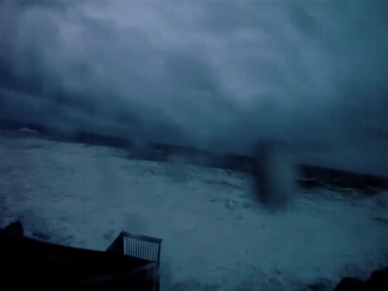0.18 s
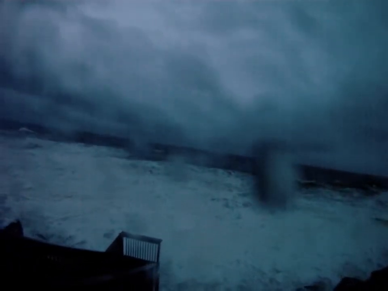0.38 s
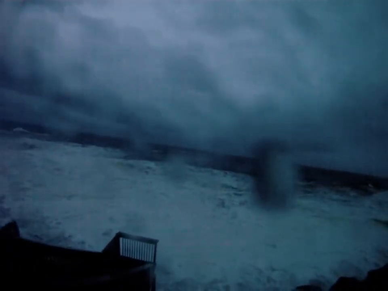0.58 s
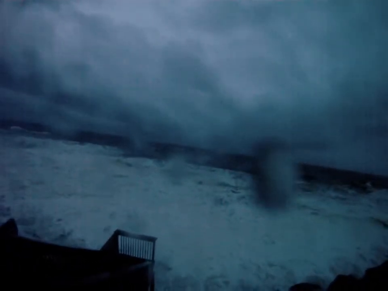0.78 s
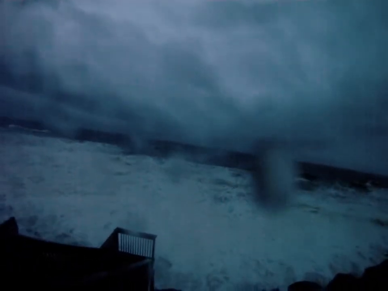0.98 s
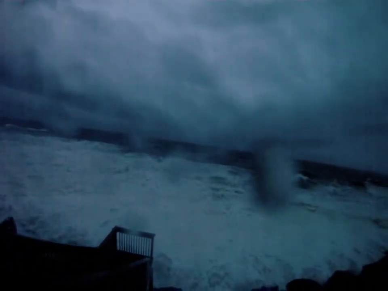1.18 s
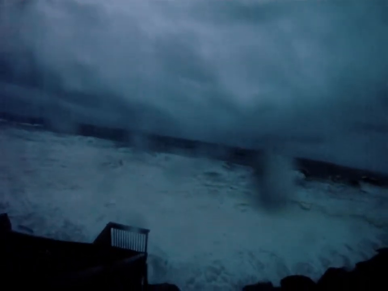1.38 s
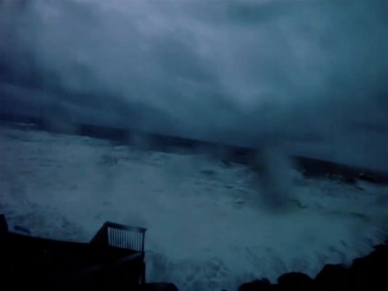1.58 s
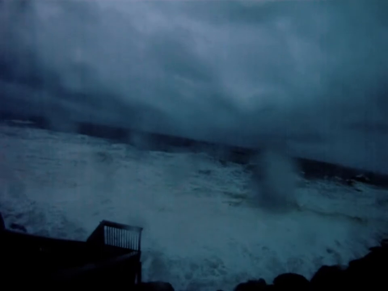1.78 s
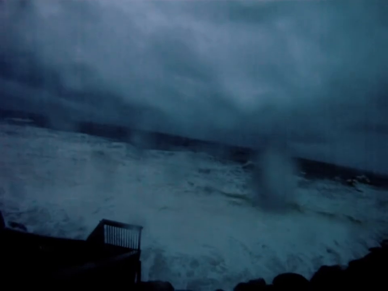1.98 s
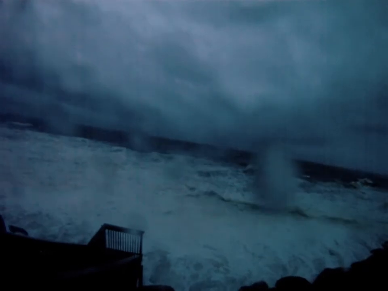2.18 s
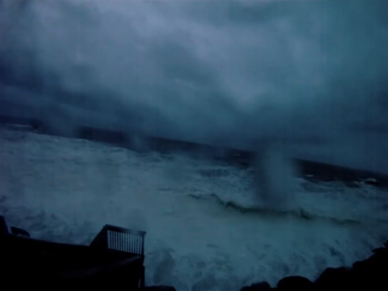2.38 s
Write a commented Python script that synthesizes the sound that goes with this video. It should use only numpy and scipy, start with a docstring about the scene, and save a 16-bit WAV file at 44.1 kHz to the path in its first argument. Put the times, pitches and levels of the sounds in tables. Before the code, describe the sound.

Sharp drops tap a plastic housing throughout about 2.4 seconds, close and centred. Two strong knocks come near 0.2 s, then scattered ticks, with a loud dull tap at 0.7 and another at 1.6. Muffled surf hushes behind, dips around 0.9, swells from 1.3 and peaks near 1.75. Spray washes past at 1.7; fine droplets patter. Low wind gusts thump near 0.5, 1.45, 1.6 and 2.35.

```python
"""Inside a waterproof camera housing at a seawall: storm surf rushes and swells in the second half.
The surf is coloured noise with drifting patches; wind rumbles on the case as low, gusty noise.
Drops of spray tick on the plastic shell: each rings its short modes, splatters and rebounds.
A patter of fine droplets follows the swell, and a brief sheet of spray washes past."""
import sys
import numpy as np
from scipy import signal
from scipy.fft import rfft, irfft
from scipy.io import wavfile
from scipy.ndimage import uniform_filter1d

SR = 44100
rng = np.random.default_rng(int(sys.argv[2]) if len(sys.argv) > 2 else 0)


def store_pcm(level_fs):
    """Save levels as 16-bit WAV."""
    pcm = np.round(np.clip(level_fs, -1, 1) * 32767).astype(np.int16)
    wavfile.write(sys.argv[1], SR, np.atleast_2d(pcm).T)


N = 105840

# Rush of the surf through the shell, relative: pitch_hz, density_db (per Hz)
SURF_COLOUR = [(100, 11.5), (300, 0), (500, -6), (800, -8.5), (1220, 1), (1600, -5.5), (2250, 0.5),
               (2700, -0.5), (3150, -8.5), (3700, -0.5), (4300, -11), (5400, -14.5), (7000, -19),
               (7700, -17.5), (8500, -8.5), (9000, -14.5), (9900, -15.5), (10600, -20.5), (11300, -48.5)]
# Rise and fall of the surf, before SURF_TRIM_DB: time_s, level_db
SWELL_LEVEL = [(0.02, -44.5), (0.54, -44), (0.72, -46.5), (0.95, -47), (1.32, -44), (1.46, -42),
               (1.75, -40.5), (2.4, -41.5)]
SURF_TRIM_DB, PATCH_RMS_DB, FLICKER_RMS_DB = 1, 1.78, 1.5

# One sheet of spray sweeping the case: centre_s, width_s, level_db
SPRAY_SHEET = (1.674, 0.048, -41)
# Its colour, relative: pitch_hz, density_db (per Hz)
SPRAY_COLOUR = [(100, -3), (300, 3), (800, -3), (2500, 0), (5000, -7), (10500, -16)]

# Large drops on the shell: start_s, level_db (before DROP_TRIM_DB), then colour against the third point:
# thud_db, knock_db, tick_db, fizz_db, top_db; then splatter_db (against the modes),
# rebound_delay_s, rebound_db (against the first tap)
DROP_HITS = [(0.2182, -1, -22, -18, -11.5, -14, -13.5, -30, 0.00077, -1),
             (0.2468, 3, 12.5, -5, -15.5, -12.5, -9, -42, 0.00089, -8),
             (0.3424, -28, -1, -5, -3, -5, -13, -26, 0.00032, -3),
             (0.4362, -29, 1, 3, 0, 3, -9, -20, 0.00031, -5),
             (0.5882, -20.5, -5, -14, -14, -10, -14, -28.0, 0.00083, -8),
             (0.6748, -29.5, -4, -8, -10, -7, -11, -28.0, 0.00087, -5),
             (0.6958, -11, 4, -12, -16, -16, -13, -23, 0.00087, -1.5),
             (0.915, -16.5, -22, -7.5, 9, 7.5, -13.5, -33, 0.00031, -12),
             (0.952, -28.5, 6, -3, 0, -5, -15, -39, 0.00058, -15),
             (1.113, -21, 2, -11, -24, -30, -15.5, -30, 0.0012, -1),
             (1.2153, -14.5, -13, 0, 4, 3, -15, -17, 0.0005, -9),
             (1.237, -40, -11, -1, -7, -13, -9, -27.0, 0.00045, -10),
             (1.3216, -26.5, 13, 0.5, -5.5, -17, -8, -28.0, 0.00055, -9),
             (1.3785, -15.5, -20, 0, -1.5, -7, -12, -25.0, 0.0011, -2.5),
             (1.3822, -19, -12, -28, 5.5, 3.5, -15, -30, 0.00084, -12),
             (1.58, -17.5, -10, -21.5, -14, -15, -12, -28.0, 0.00076, -4),
             (1.609, -2.5, -9, -17, -19, -39, -10, -29, 0.00087, -13.5),
             (1.618, -32, -13, -7, -9, 3, -16, -23.0, 0.00032, -7),
             (1.677, -27, 0, 4, 2, 0, -9, -19.0, 0.00041, 0),
             (1.775, -33, -12, -11, 5, 0, -15, -25.0, 0.00045, -10),
             (1.783, -23.5, -15, -1, -5, -9, -10, -30, 0.00052, -6),
             (1.876, -25, 7, 0.5, -13, -10, -16, -23, 0.00031, -4),
             (1.9474, -21.5, -7, -25, -10, -13, -13, -25, 0.00054, -1),
             (1.9662, -19.5, -1, 3, 1.5, -1.5, -12, -17, 0.00038, -2.5),
             (2.1149, -9, -8, -10, -1.5, -3.5, -9, -27.0, 0.00059, -11),
             (2.1785, -26.5, 2, -6, 7, 4, -10, -30, 0.00058, -7),
             (2.255, -30.5, -1, -21, 6, 2, -12, -23.0, 0.00034, -5),
             (2.2876, -16.5, -4, -24, -11, -18, -12, -25, 0.00068, -4),
             (2.2923, -17, -10, -13, -1, -2, -14, -19, 0.00038, -4)]
# Where a drop's colour is set, the third point being its 0 dB: pitch_hz
DROP_COLOUR_HZ = [500, 1200, 2300, 4000, 8400, 9900]
# Ringing modes of the shell, before a drop's colour: pitch_hz, level_db, fall_by_60_db_s
SHELL_MODES = [(1210, -4, 0.009), (2168, -0.6, 0.007), (2800, -5.5, 0.009), (3700, -2.5, 0.0079),
               (4800, 1.5, 0.0021), (7640, 1, 0.0015), (8360, -8.5, 0.01), (9650, -1.5, 0.0089)]
DROP_TRIM_DB, SPLATTER_T60_S = -0.5, 0.074
BASS_HZ, BASS_DB = 80, -16  # a drop moves little air: its bass lies this far below its thud

MIST_PER_S, MIST_DB, MIST_SPREAD_DB = 110, -19.5, 9  # fine droplets; level against SWELL_LEVEL

# Wind on the case, relative: pitch_hz, density_db (per Hz)
WIND_COLOUR = [(10, -11), (25, -5.5), (50, 0), (95, -2), (140, -9), (200, -13.5), (300, -20), (500, -26.5),
               (1200, -33)]
# Strength of the gusts, before WIND_TRIM_DB: time_s, level_db
GUST_LEVEL = [(0.0, -43.5), (0.15, -42), (0.5, -38.5), (0.87, -50.5), (0.92, -43.5), (1.3, -42.5),
              (1.44, -34.5), (1.54, -46.5), (1.61, -36), (2.21, -45.5), (2.37, -35.5), (2.4, -43)]
WIND_TRIM_DB, BUFFET_RMS_DB = -0.9, 0.8

NOTCH_HZ, NOTCH_WIDTH_HZ, NOTCH_DB = 6064, 380, -17  # a narrow band the microphone hardly passes
EDGE_HZ = 11000  # upper limit of the sound


def amp(db):
    """Turns decibels into gain."""
    return 10 ** (np.asarray(db) / 20)


def unit(x):
    """Scales a sound to an rms of 1."""
    return x / np.sqrt(np.mean(x ** 2) + 1e-20)


def read(points, hz):
    """Reads a spectrum between its points, on a log-frequency axis."""
    point_hz, value = np.transpose(points)
    return np.interp(np.log(hz + 1), np.log(point_hz + 1), value)


def level(points):
    """Turns rows of time_s, level_db into gain over time."""
    return amp(np.interp(np.arange(N) / SR, *np.transpose(points)))


def add(mix, start_s, sound):
    """Mixes a sound in at its start time."""
    part = mix[max(round(start_s * SR), 0):][:len(sound)]
    part += sound[:len(part)]


def wander(rate_hz):
    """Makes random motion of rms 1, at around the given rate."""
    ratio = np.fft.rfftfreq(N, 1 / SR) / rate_hz
    spectrum = rfft(rng.standard_normal(N)) * ratio * np.exp(-ratio ** 2)
    return unit(irfft(spectrum, N))


def noise(points):
    """Makes noise of rms 1 with the given colour."""
    gain = amp(read(points, np.fft.rfftfreq(N, 1 / SR)))
    return unit(irfft(rfft(rng.standard_normal(N)) * gain, N))


def surf():
    """Churning foam: a wide rush with drifting patches of colour, following the swell."""
    hz, _, grid = signal.stft(rng.standard_normal(N), SR, nperseg=512, noverlap=384)
    # Smooth random values over pitch, then time, so neighbours rise and fall together
    patches = uniform_filter1d(rng.standard_normal(grid.shape), size=7, axis=0)
    patches = unit(uniform_filter1d(patches, size=9, axis=1))
    grid = grid * amp(read(SURF_COLOUR, hz)[:, None] + PATCH_RMS_DB * patches)
    rush = signal.istft(grid, SR, nperseg=512, noverlap=384)[1][:N]
    flicker_db = FLICKER_RMS_DB * wander(rate_hz=100)
    return unit(rush) * level(SWELL_LEVEL) * amp(SURF_TRIM_DB + flicker_db)


def sheet():
    """A wash of spray: coloured noise with a ragged level that swells and fades in a brief bell shape."""
    centre_s, width_s, level_db = SPRAY_SHEET
    ragged = amp(level_db + 3.2 * wander(rate_hz=110))
    bell = np.exp(-0.5 * ((np.arange(N) / SR - centre_s) / width_s) ** 2)
    return ragged * noise(SPRAY_COLOUR) * bell


def tint(x, points, size=2048):
    """Colours a short sound without spreading it ahead of its start, so its attack stays sharp."""
    log_gain = np.log(amp(read(points, abs(np.fft.fftfreq(size, 1 / SR)))))
    response = np.exp(np.conj(signal.hilbert(log_gain)))  # minimum phase
    return np.fft.ifft(np.fft.fft(x, size) * response).real


def ring(splatter_db, scatter_db, size=1500):
    """One drop rings the shell's modes, each as strongly as the landing spot allows, and splatters."""
    t = np.arange(size) / SR
    modes = np.zeros(size)
    for k, (hz, db, t60_s) in enumerate(SHELL_MODES):
        spot_db = scatter_db * rng.standard_normal()
        sign = (-1) ** k  # neighbouring modes start in opposite directions
        modes += sign * amp(db + spot_db - 60 * t / t60_s) * np.sin(2 * np.pi * hz * t)
    fade = amp(-60 * t / SPLATTER_T60_S)
    return modes + amp(splatter_db) * fade * rng.standard_normal(size)


def drops():
    """Slow fat drops knock, small fast ones tick; each collapses and pushes the shell a second time."""
    out = np.zeros(N)
    for start_s, db, thud, knock, tick, fizz, top, splatter, rebound_s, rebound_db in DROP_HITS:
        colour_db = [thud, knock, 0, tick, fizz, top]
        colour = [(BASS_HZ, thud + BASS_DB), *zip(DROP_COLOUR_HZ, colour_db)]
        tap = amp(DROP_TRIM_DB + db) * tint(ring(splatter, scatter_db=1.5), colour)
        add(out, start_s, tap)
        add(out, start_s + rebound_s, amp(rebound_db) * tap)
    return out


def mist(spots=12):
    """Fine droplets patter at random on many spots of the shell, harder as the surf swells."""
    out = np.zeros(N)
    for _ in range(spots):
        landed = rng.random(N) < MIST_PER_S / spots / SR
        strength = amp(MIST_SPREAD_DB * np.minimum(rng.exponential(1, N), 3))
        out += signal.oaconvolve(landed * strength, ring(splatter_db=-20, scatter_db=0.5))[:N]
    return amp(MIST_DB) * level(SWELL_LEVEL) * unit(out)


def wind():
    """Gusts on the case: low noise whose level moves in lumps."""
    buffets = amp(BUFFET_RMS_DB * wander(rate_hz=13.6))
    rumble = unit(noise(WIND_COLOUR) * buffets)
    return level(GUST_LEVEL) * rumble * amp(WIND_TRIM_DB)


def scene():
    """Everything reaches one microphone, so both channels are the same."""
    mono = surf() + sheet() + drops() + mist() + wind()
    return np.array([mono, mono])


def record(dry):
    """Weakens a narrow band, flattens peaks at full scale, then removes everything above EDGE_HZ."""
    hz = np.fft.rfftfreq(N, 1 / SR)
    notch = amp(NOTCH_DB * np.exp(-((hz - NOTCH_HZ) / NOTCH_WIDTH_HZ) ** 2))
    flattened = np.clip(irfft(rfft(dry) * notch, N), -1, 1)
    low_pass = signal.firwin(301, EDGE_HZ, window=("kaiser", 8), fs=SR)
    return signal.oaconvolve(flattened, low_pass[None], "same")


dry = scene()
out = record(dry)
store_pcm(out)
```